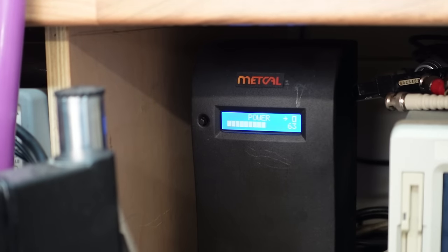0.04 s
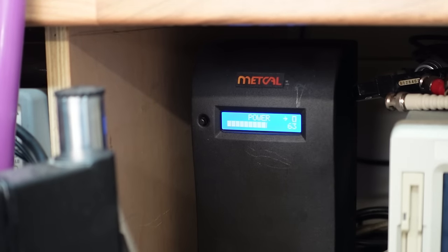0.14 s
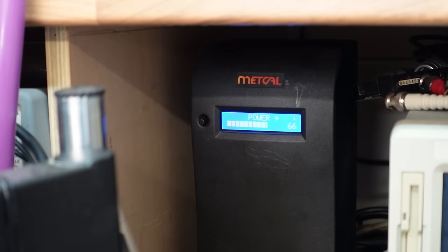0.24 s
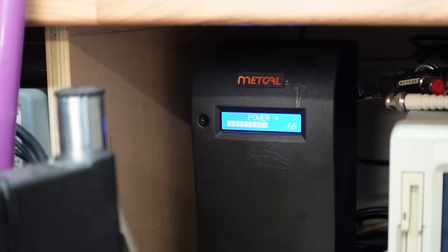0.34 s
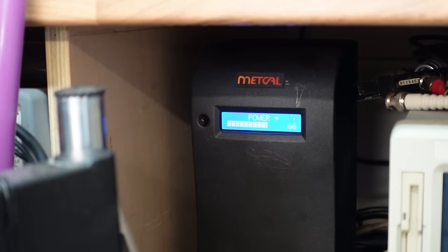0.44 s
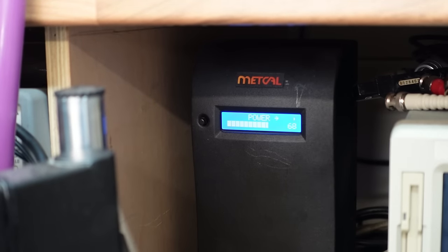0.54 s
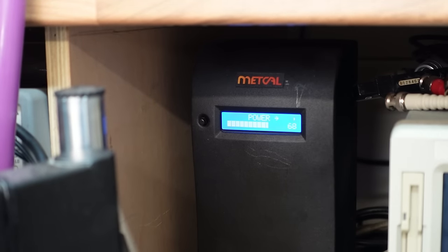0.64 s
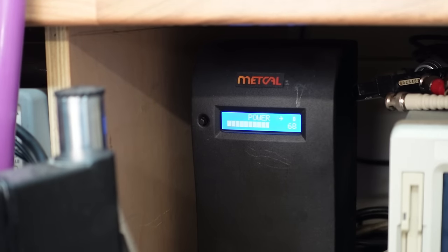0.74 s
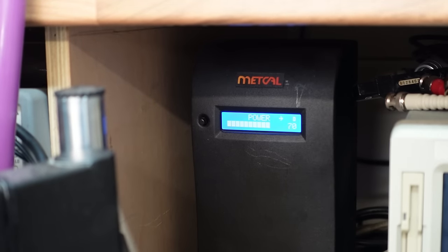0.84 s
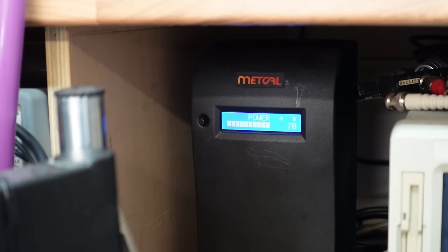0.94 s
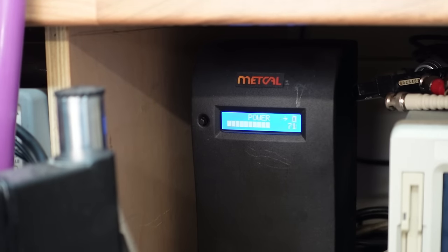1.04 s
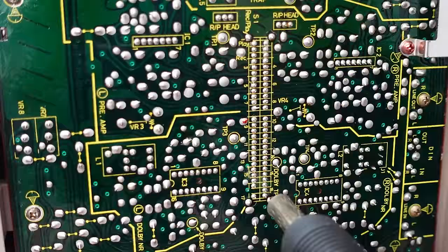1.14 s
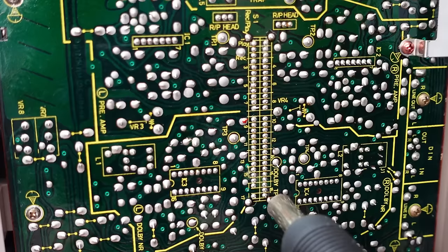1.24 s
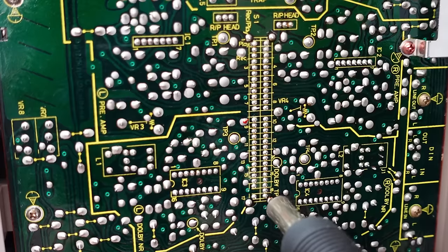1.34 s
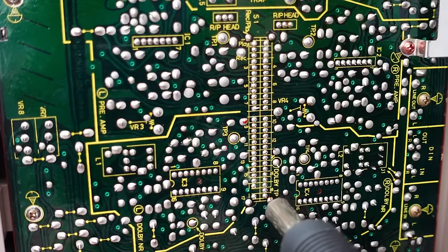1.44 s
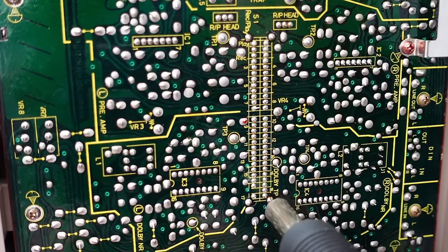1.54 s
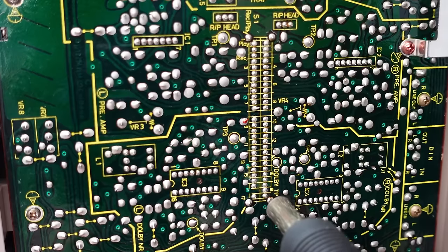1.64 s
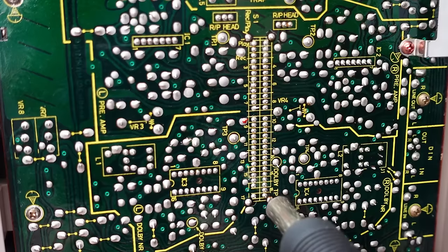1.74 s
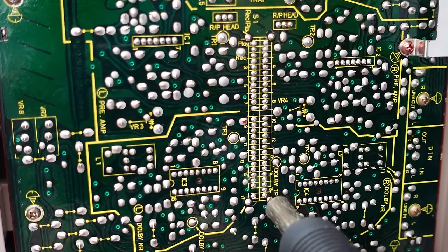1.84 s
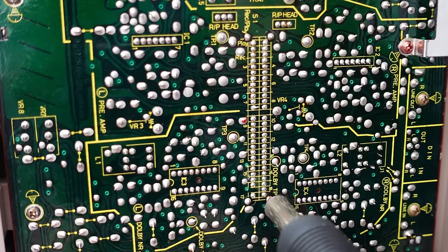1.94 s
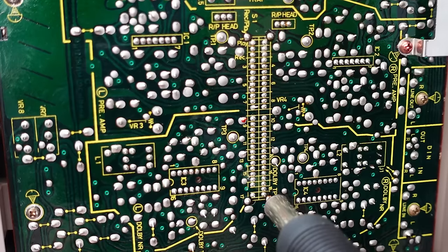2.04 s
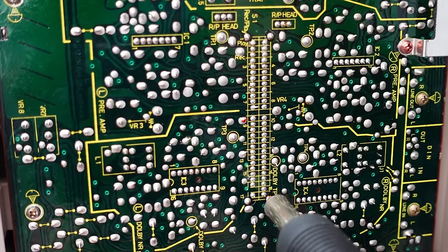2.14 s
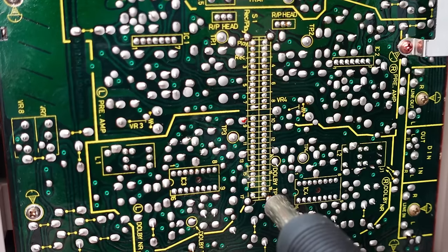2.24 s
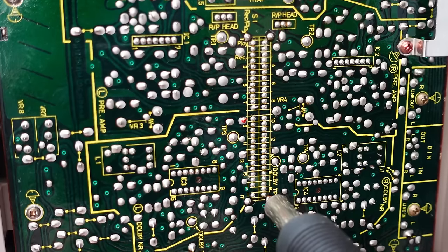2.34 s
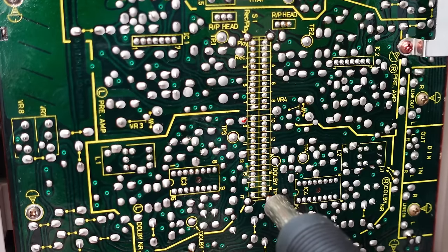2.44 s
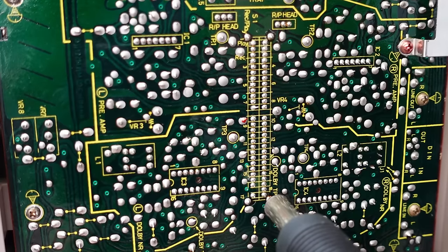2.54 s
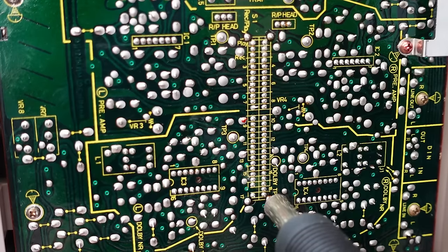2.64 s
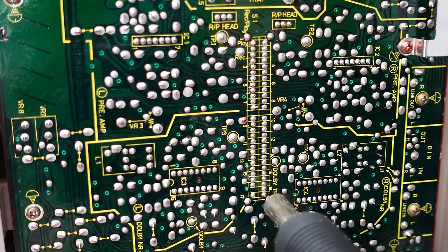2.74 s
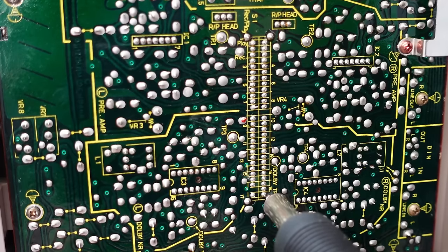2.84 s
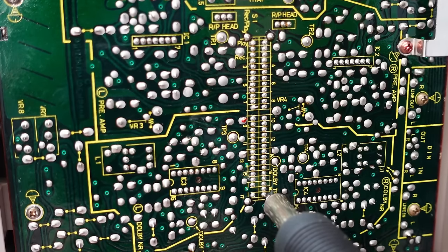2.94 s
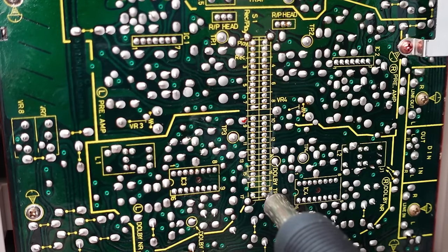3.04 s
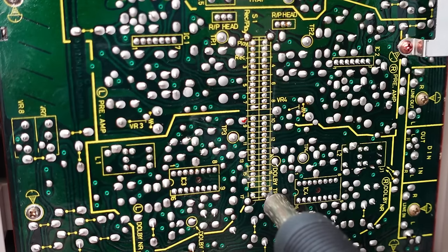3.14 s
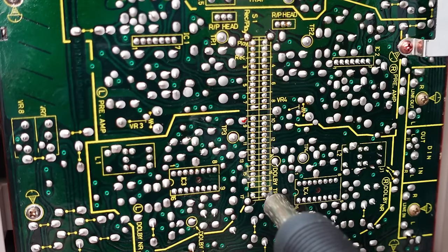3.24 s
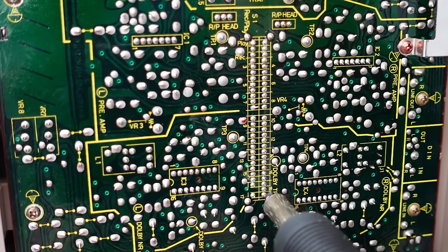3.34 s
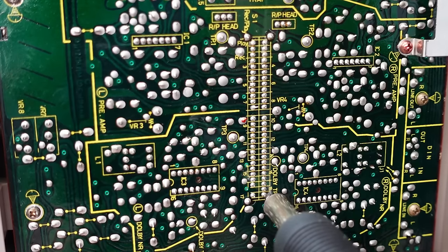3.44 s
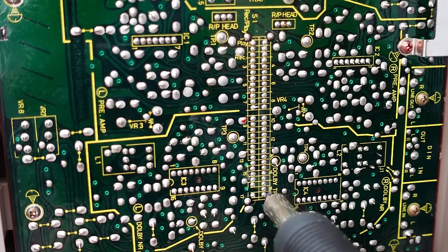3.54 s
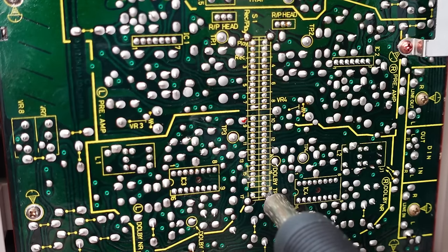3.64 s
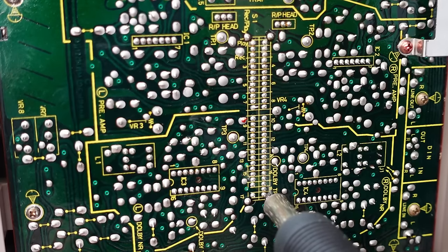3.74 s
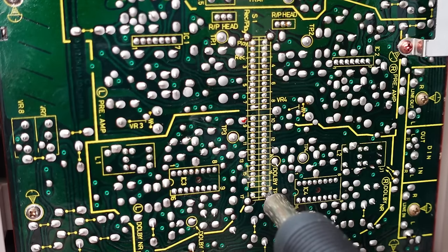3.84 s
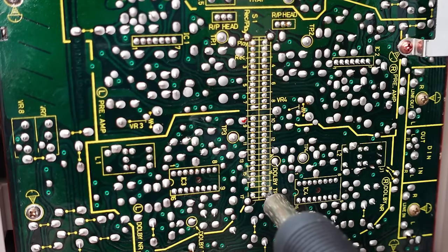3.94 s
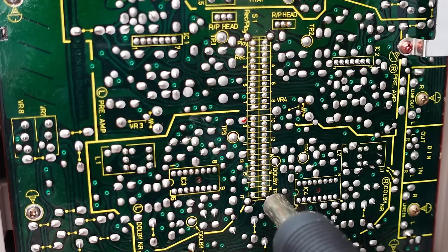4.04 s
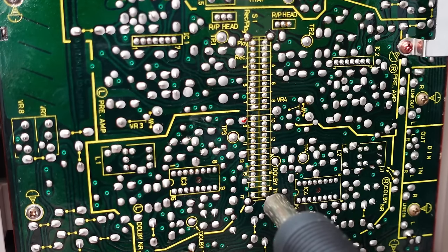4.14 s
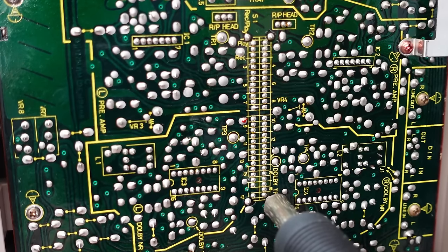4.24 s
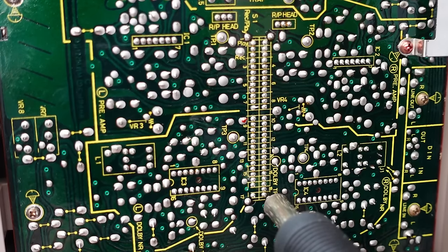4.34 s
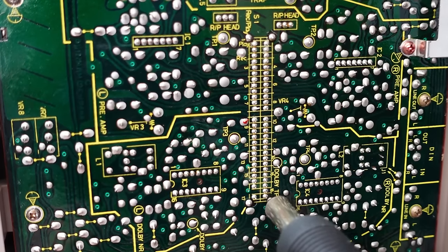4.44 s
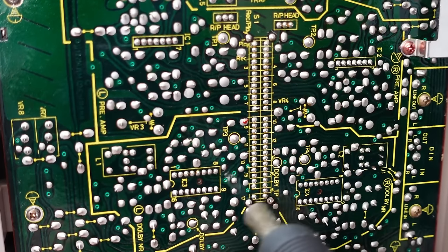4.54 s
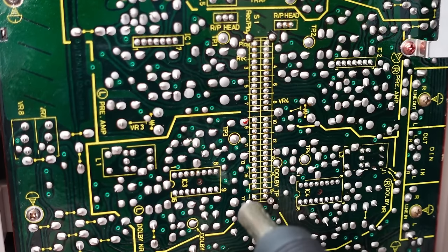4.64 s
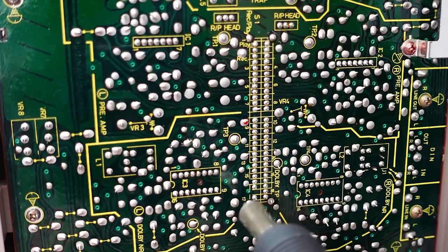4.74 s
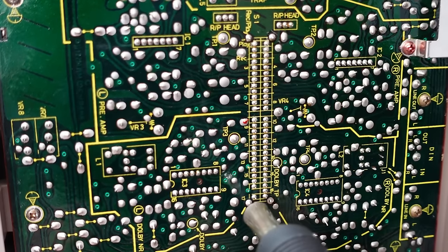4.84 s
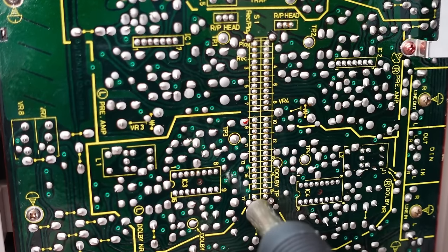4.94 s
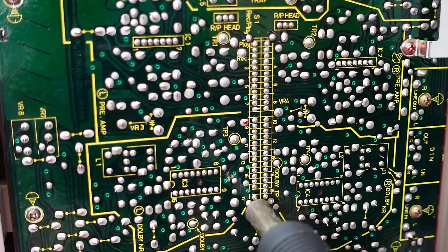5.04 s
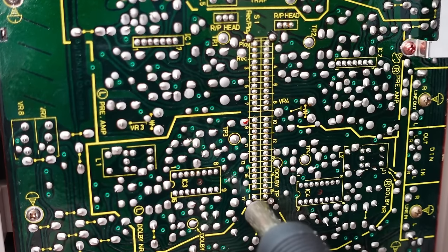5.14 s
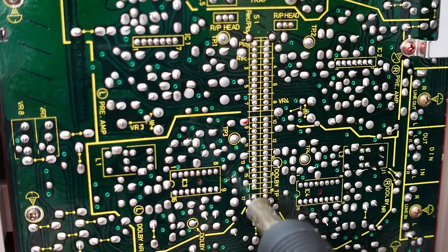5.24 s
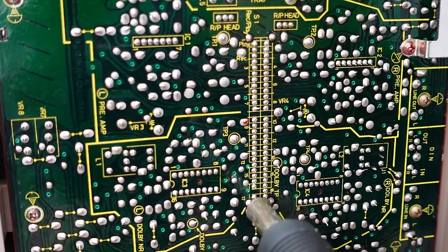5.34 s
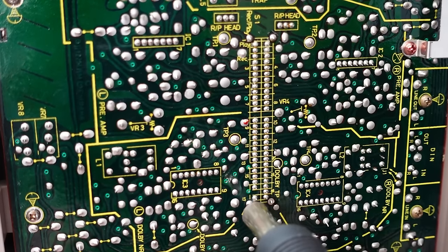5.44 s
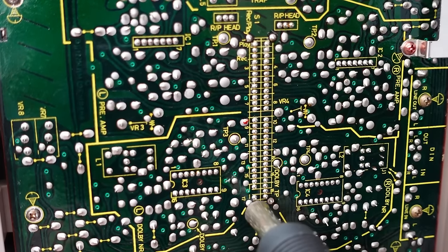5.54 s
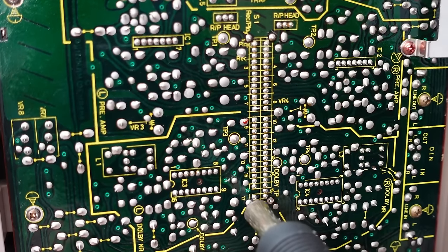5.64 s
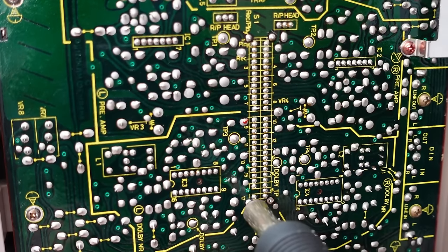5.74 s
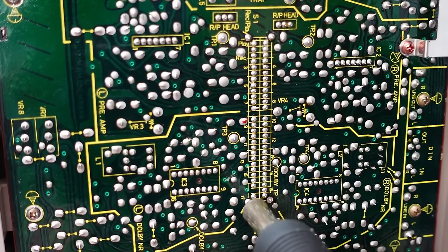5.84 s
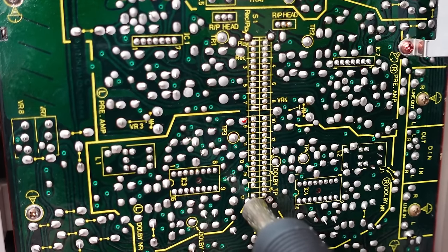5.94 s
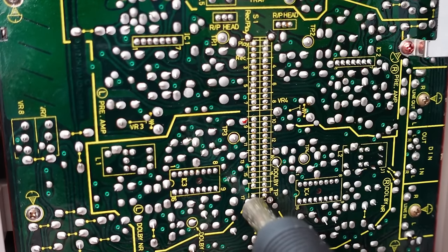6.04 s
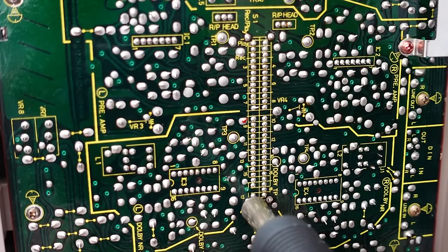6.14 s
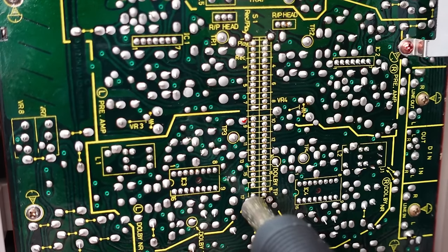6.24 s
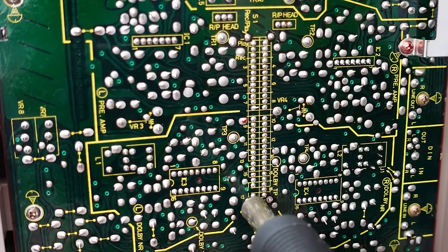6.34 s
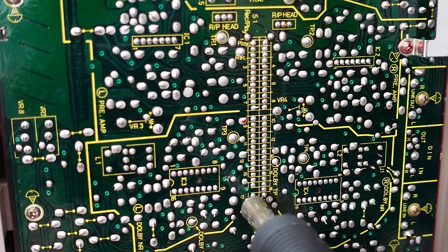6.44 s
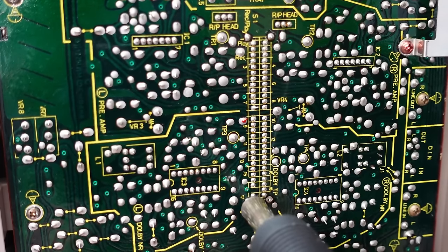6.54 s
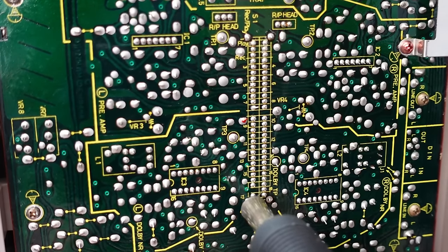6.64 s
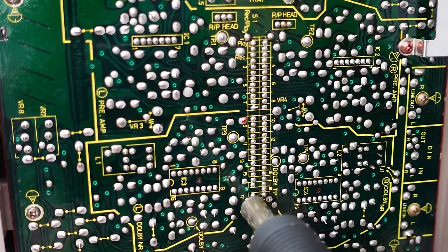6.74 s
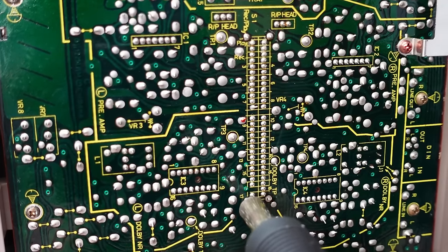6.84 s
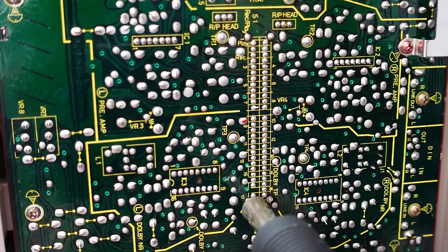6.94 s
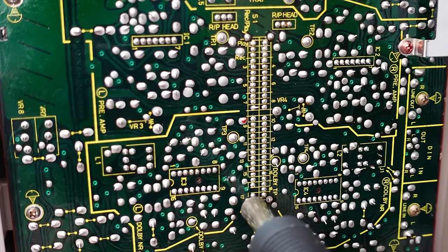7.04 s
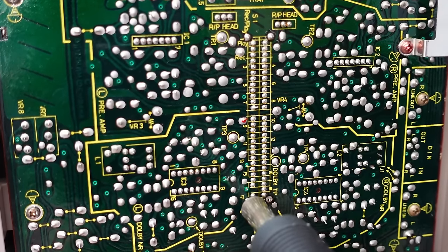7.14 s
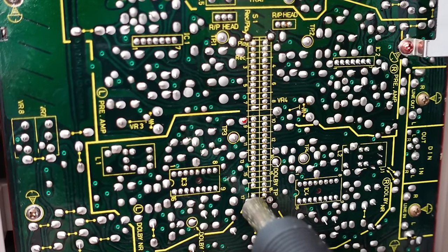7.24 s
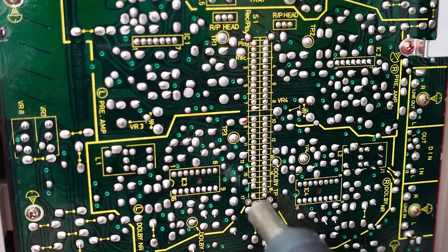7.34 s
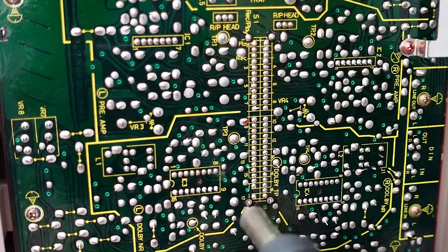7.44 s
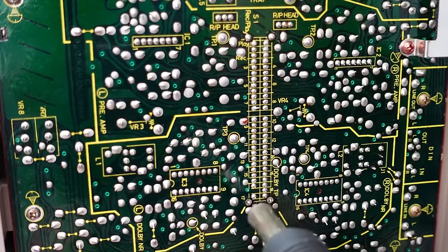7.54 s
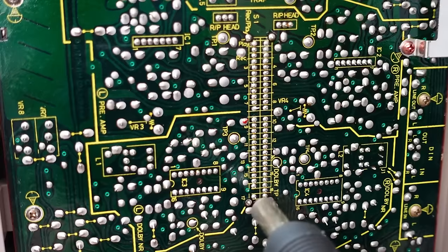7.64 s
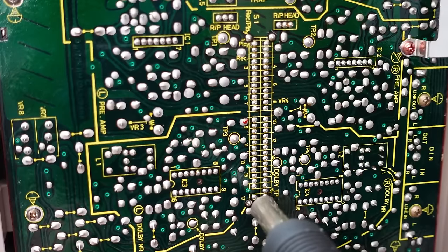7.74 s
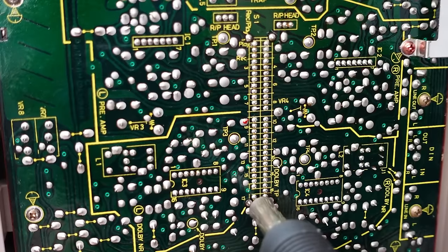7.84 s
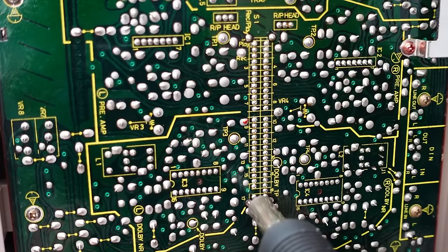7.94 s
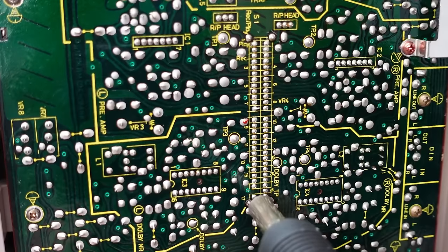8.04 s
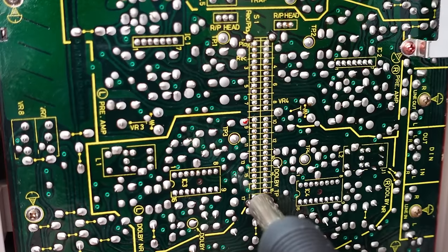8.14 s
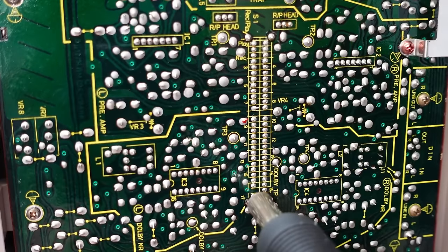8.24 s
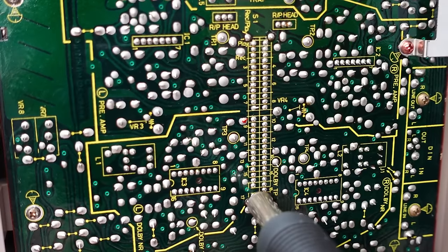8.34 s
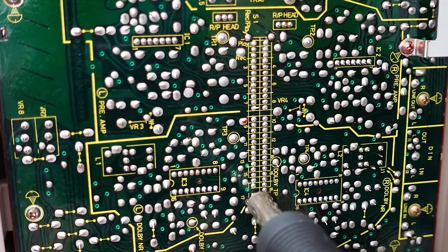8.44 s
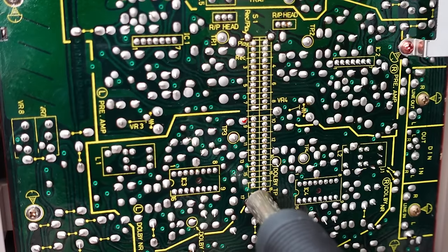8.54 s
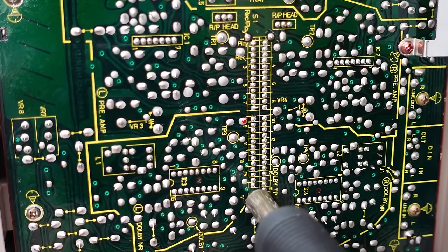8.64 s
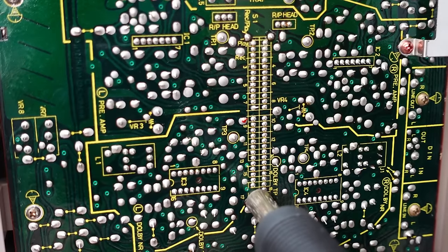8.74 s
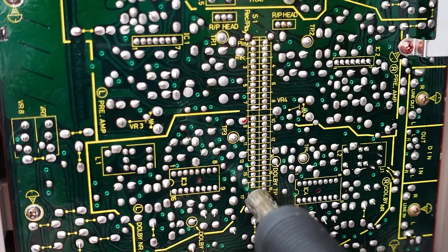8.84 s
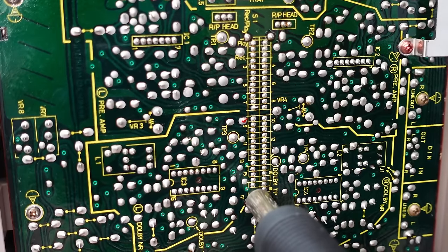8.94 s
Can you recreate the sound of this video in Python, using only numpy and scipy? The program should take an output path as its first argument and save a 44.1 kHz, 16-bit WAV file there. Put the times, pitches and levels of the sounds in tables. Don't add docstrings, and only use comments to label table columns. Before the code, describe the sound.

Close mono microphone at a workshop bench with steady fan drone and a thin air-leak hiss. A hot tool tip knocks sharply on a circuit board, then after a quieter stretch a bright, roaring blast of compressed air bursts out and cuts off with a crack. More taps and gritty scrapes follow, then a second, slightly longer blast, a soft breathy inrush of air, and small clicks.

```python
import sys
import numpy as np
from scipy import signal
from scipy.fft import rfft, irfft, next_fast_len
from scipy.io import wavfile
from scipy.ndimage import uniform_filter1d, map_coordinates

SR = 44100
rng = np.random.default_rng(int(sys.argv[2]) if len(sys.argv) > 2 else 0)


def field_ratio(decibels):
    return 10 ** (np.asarray(decibels, dtype=float) / 20)


def to_wav(sig):
    pcm = np.clip(np.atleast_2d(sig), -1, 1) * 32767
    pcm = np.round(pcm).astype(np.int16)
    wavfile.write(sys.argv[1], SR, pcm.T)


N = 396900
T = np.arange(N) / SR


def unit(x):
    return x / np.sqrt(np.mean(x ** 2) + 1e-20)


def along(points, hz):
    f, v = np.transpose(points)
    return np.interp(np.log(hz + 1), np.log(f + 1), v)


def curves(rows):
    s, *cols = np.transpose(rows)
    return [np.interp(T, s, c) for c in cols]


def wobble(rate):
    coarse = T[::16]
    knots = rng.standard_normal(int(N * rate / SR) + 4)
    return np.interp(T, coarse, map_coordinates(knots, [coarse * rate]))


def filtered(x, response):
    m = next_fast_len(len(x) + 8192)
    return irfft(rfft(x, m) * response(np.fft.rfftfreq(m, 1 / SR)), m)[:len(x)]


def humps(peaks, hz):
    return sum(field_ratio(db) ** 2 / (1 + (2 * (hz - c) / w) ** 2) for c, w, db in peaks)


def rush(gain, patchy_db):
    z = signal.stft(rng.standard_normal(N + 512), nperseg=512)[2]
    field = uniform_filter1d(rng.standard_normal(z.shape), 5, 0)
    field = uniform_filter1d(field, 10, 1)
    noise = signal.istft(z * field_ratio(patchy_db * unit(field)), nperseg=512)[1][:N]
    return unit(filtered(noise, gain))


def shop():
    # (time [s], fans [dB], leak [dB])
    shop_levels = [
        (0.0, -46.5, -47),
        (9.0, -44.5, -46),
    ]
    # (frequency [Hz], density [dB per Hz])
    fans_near = [(15, -31), (25, -3.5), (70, -10.5), (257, -1), (365, -6), (403, -5.5), (427, -14),
                 (489, -10), (667, -5.5), (750, -13), (910, -6), (1420, -18), (1660, -10.5), (1830, -20),
                 (2600, -23.5), (3380, -49), (5720, -120)]
    fans_far = [(15, -37), (25, -5), (141, -7.5), (257, -0.5), (387, -7), (452, -12), (654, -9), (735, -12),
                (826, -8.5), (1040, -2.5), (1270, -18), (1510, -10), (1700, -20), (1870, -14), (2600, -32),
                (3380, -55), (5720, -120)]
    # (frequency [Hz], density [dB per Hz])
    leak_colour = [(1290, -45), (2200, -11.5), (2780, -13), (3420, -2.5), (4030, 0.5), (5480, -15.5),
                   (6160, -18.5), (6640, -9), (7090, -7.5), (7900, -8.5), (8510, -17), (10500, -23.5),
                   (14500, -27), (16000, -24)]
    # (frequency [Hz], level [dB])
    blades = [(172.3, -57), (500.6, -60.5), (678.3, -56.5), (899.0, -58), (1071, -60), (1195, -60),
              (1507, -66.5), (1653, -60.5)]
    # (time [s], level [dB])
    motor_levels = [
        (7.38, -73),
        (7.45, -50.5),
        (8.6, -49),
        (8.7, -66),
    ]
    moved = T > 1.2

    fans_db, leak_db = curves(shop_levels)
    near = rush(lambda hz: field_ratio(along(fans_near, hz)), patchy_db=-0.5)
    far = rush(lambda hz: field_ratio(along(fans_far, hz)), patchy_db=2.0)
    fans = np.where(moved, near, far) * field_ratio(fans_db + .3 * wobble(3))
    leak = rush(lambda hz: field_ratio(along(leak_colour, hz)), patchy_db=0.67) * field_ratio(leak_db + 0.37 * wobble(8))
    tones = sum(field_ratio(db - 1.0 + 1.1 * wobble(2.9)) * np.sin(2 * np.pi * hz * T + 1.4 * wobble(6))
                for hz, db in blades)
    motor_db = curves(motor_levels)[0] + 0.72 * wobble(4)
    motor = field_ratio(motor_db) * np.sin(2 * np.pi * 88.5 * T + .3 * wobble(4))
    whine_db = -71 - 7 * moved + wobble(5)
    whine = field_ratio(whine_db) * np.sin(2 * np.pi * 15551 * T + .5 * wobble(20))
    return fans + leak + tones + motor + whine


def knocks():
    # (time [s], peak [dB], bench share [dB], tick share [dB], crack share [dB])
    contacts = [(1.213, -4, -24, -18, -36), (1.237, -18.5, -23, -27, -31), (1.5423, -5, -21, -39, -35.5),
                (1.6649, -10, -26, -35, -38), (1.8166, -22.5, -5.5, -18, -28),
                (2.759, -16.5, -21, -26, -35), (4.481, -8, -43, -5, -4), (4.547, -14.5, -20, -22, -12),
                (5.256, -22, -7.5, -9, -26), (5.401, -34, -11, -13.5, -19), (5.5402, -7, -17, -13, -25),
                (5.5763, -13.5, -24, -24, -33), (7.398, -11, -20.5, -10, -7), (7.91, -23.5, -16, -28, -33),
                (7.966, -40.5, -1.5, -21, -18), (8.0658, -32.5, -4.5, -20, -20),
                (8.097, -20.5, -19, -6, -22), (8.104, -29, -22, -8, -19), (8.1925, -23.5, -3, -24, -34),
                (8.5568, -22.5, -6, -22, -28), (8.634, -44, -2, -15, -25), (8.828, -47, -6, -17, -25)]
    # (frequency [Hz], level [dB], t60 [s])
    bench_modes = [(216, -20, 0.16), (297, 7.5, 0.086), (326, 11, 0.125), (413, 3, 0.12),
                   (542, 16.5, 0.021)]
    board_modes = [(705, -3, 0.09), (998, -12.5, 0.1), (1296, 2, 0.041), (1415, -2, 0.043),
                   (1744, -9, 0.11), (1920, 3.5, 0.027), (2120, -2.5, 0.039), (2402, -8.5, 0.04),
                   (2820, -14, 0.027), (3080, -7, 0.025)]
    tick_modes = [(2510, 6, 0.055), (2850, -2.5, 0.041), (2940, 8, 0.011), (3300, -26, 0.04)]
    tip_hz, tip_db, tip_t60 = 4980, 2.5, .03

    out, t = np.zeros(N + SR), np.arange(SR // 4) / SR
    rattle_band = signal.butter(3, [300, 2100], "band", fs=SR)
    crack_band = signal.butter(2, [3600, 9000], "band", fs=SR)
    blunt_band = signal.butter(6, [130, 3300], "band", fs=SR, output="sos")

    def ring(modes, stretch):
        return sum(field_ratio(level + rng.normal(0, 0.9) - 60 * t / (t60 * stretch))
                   * np.sin(2 * np.pi * hz * rng.normal(1, 0.0094) * t) for hz, level, t60 in modes)

    for s, db, bench_db, tick_db, crack_db in contacts:
        stretch = max(0.67 - .002 * db, .2)
        board = 0.36 * ring(board_modes, stretch)
        bench = 0.44 * field_ratio(bench_db) * ring(bench_modes, stretch)
        tick = 0.53 * field_ratio(tick_db) * ring(tick_modes, stretch)
        rattle = signal.lfilter(*rattle_band, rng.standard_normal(len(t)))
        rattle *= field_ratio(-4.5 - 60 * t / (0.12 * stretch))
        crack = signal.lfilter(*crack_band, rng.standard_normal(len(t)))
        crack *= field_ratio(crack_db + 11.5 - 60 * t / 0.028)
        tip_tone = np.sin(2 * np.pi * tip_hz * rng.normal(1, 0.0097) * t)
        crack += field_ratio(crack_db + tip_db - 60 * t / tip_t60) * tip_tone
        push = np.diff(np.exp(-((t - .0004) / .00013) ** 2), prepend=0)
        push_db = 19.0 - .35 * max(bench_db + 20, 0)
        hit = board + bench + tick + rattle + field_ratio(push_db) * push
        out[round((s + .0009) * SR):][:len(t)] += field_ratio(db - 3) * (signal.sosfilt(blunt_band, hit) + crack)
    return out[:N]


def swelling_tones():
    # (time [s], frequency [Hz], level [dB], length [s])
    swells = [(1.993, 9400, -49, .005), (1.993, 14500, -55, .005), (1.996, 2290, -45, .008),
              (2.76, 1150, -22.5, 0.0076), (2.758, 2450, -28.5, .006), (3.01, 2300, -41, 0.0063),
              (3.01, 3300, -35.5, 0.0067), (3.006, 7600, -45, .008), (4.042, 1250, -25, 0.0044),
              (4.047, 1150, -13, 0.0087), (4.475, 961, -18, 0.011), (5.285, 322, -31, 0.04),
              (6.8293, 1230, -26, 0.0036), (6.835, 1050, -4.5, 0.0032), (7.385, 1300, -17, .011),
              (7.394, 947, -17.5, .011), (8.096, 2740, -25.5, 0.006)]
    out = np.zeros(N + SR)
    for s, hz, db, length in swells:
        u = T[:round(length * SR)]
        swell = np.sin(np.pi * u / length)
        out[round(s * SR):][:len(u)] += field_ratio(db) * np.sin(2 * np.pi * hz * (s + u)) * swell
    return out[:N]


def snicks():
    # (time [s], level [dB])
    snaps = [
        (1.994, -47),
        (8.647, -45),
        (8.844, -50),
    ]
    # (low [Hz], high [Hz])
    snap_hz = [8500, 15500]
    out, t = np.zeros(N + SR), T[:SR // 50]
    band = signal.butter(2, snap_hz, "band", fs=SR)
    for s, db in snaps:
        click = unit(signal.lfilter(*band, rng.standard_normal(len(t))))
        out[round(s * SR):][:len(t)] += field_ratio(db - 60 * t / .012) * click
    return out[:N]


def scrapes():
    # (time [s], length [s], level [dB], centre [Hz])
    slides = [
        (2.699, 0.066, -41.5, 700),
        (5.39, 0.025, -41.5, 2000),
        (5.692, 0.061, -45, 1880),
        (6.054, 0.059, -41.5, 1420),
        (7.96, .03, -55, 1200),
    ]
    out = np.zeros(N + SR)
    for s, length, db, centre in slides:
        u = T[:round(length * SR)]
        peaks = [(centre, 1300, 0), (320, 160, -2)]
        grit = filtered(rng.standard_normal(len(u)), lambda f: np.sqrt(humps(peaks, f)) * (f < 3600))
        bumps = field_ratio(2.5 * wobble(150)[:len(u)])
        out[round(s * SR):][:len(u)] += field_ratio(db) * bumps * unit(grit) * np.sin(np.pi * u / length)
    return out[:N]


def room(x):
    # (frequency [Hz], t60 [s])
    decay = [(200, 0.48), (1500, 0.12), (8000, 0.083)]
    hz, t, z = signal.stft(rng.standard_normal(SR // 2), SR, nperseg=256)
    tail = signal.istft(z * field_ratio(-60 * t / along(decay, hz)[:, None]), SR, nperseg=256)[1]
    return signal.fftconvolve(np.pad(x, (200, 0)), tail / np.linalg.norm(tail))[:N]


def echoes(x, wet_db, t60):
    t = np.arange(SR // 10) / SR
    answer = rng.standard_normal(len(t)) * field_ratio(-60 * t / t60)
    answer *= field_ratio(wet_db) / np.linalg.norm(answer)
    answer[0] = 1
    return signal.fftconvolve(x, answer / np.linalg.norm(answer))[:N]


def flow(shut_s):
    # (time [s], depth [dB], half length [s])
    falters = [
        (4.462, 4, 0.01),
        (4.489, 9, 0.0095),
        (7.37, 0, 0.013),
        (7.403, 4, .008),
    ]
    shut_db, shut_length_s, hose_s = 5.5, 0.0033, 0.035
    sag_db = sum(db * np.exp(-((T - s) / half) ** 2) for s, db, half in falters)
    emptying_s = np.maximum(T - shut_s - hose_s, 0)
    bleed_db = 300 * emptying_s
    main = field_ratio(-sag_db - shut_db * np.clip((T - shut_s) / shut_length_s, 0, 1) - bleed_db)
    seep = field_ratio(-28 - 108 * emptying_s)
    both = main ** 2 + seep ** 2 + 1e-20
    share = main ** 2 / both
    main_top_db = 3.5 + 0.55 * sag_db - .12 * bleed_db
    seep_top_db = 10
    return 10 * np.log10(both), share * main_top_db + (1 - share) * seep_top_db


def jet():
    # (opens [s], first surge [dB], pressure push [dB], shuts [s], jet level [dB])
    strokes = [
        (4.048, 8, -6, 4.482, -12.5),
        (6.8345, 7.5, -2, 7.4, -13),
    ]
    # (frequency [Hz], density [dB per Hz])
    roar = [(210, -73.5), (350, -35), (550, -27.5), (700, -18.5), (850, -11.5), (1000, -7.5), (1730, -3.5),
            (2130, -4.5), (3390, -0.5), (5570, -4.5), (6430, -0.5), (7550, -6.5), (11100, -14),
            (16000, -21.5)]
    # (centre [Hz], width [Hz], level [dB]), all rung alike
    nozzle = [(2740, 320, -2), (3520, 180, -1), (4730, 23, -2), (5020, 130, -2), (4850, 360, -2),
              (6050, 88, -3), (6600, 400, 0), (8100, 56, -6), (8620, 160, -6), (10100, 290, -5),
              (10670, 570, -7), (11300, 240, -9), (13600, 390, -13), (15200, 110, -15)]
    tubes = [(c, w, 0) for c, w, _ in nozzle]

    def colour(hz):
        return field_ratio(along(roar, hz)) * np.sqrt(1 + 1.17 * humps(tubes, hz))

    air = np.zeros(N)
    for _ in range(2):
        air += echoes(rush(colour, patchy_db=1.8), wet_db=-5, t60=0.094) * field_ratio(1.8 * wobble(6.4))
    air *= field_ratio(0.36 * wobble(45) + 0.55 * wobble(180))
    top = filtered(air, lambda hz: 1 - 1 / (1 + (hz / 8500) ** 8))
    air /= np.sqrt(np.abs(uniform_filter1d(air ** 2, SR // 10)))

    out, loud_db = np.zeros(N), np.full(N, -90.)
    for s, surge_db, push_db, shut_s, jet_db in strokes:
        flow_db, top_db = flow(shut_s)
        age = np.maximum(T - s, 0)
        db = jet_db + flow_db + surge_db * np.exp(-age / 0.0044)
        body = air - top + field_ratio(top_db) * top
        out += body * field_ratio(db) * (1 - np.exp(-age / 0.00059))
        u = np.maximum(T - s + 0.00067, 0) / 0.00043
        out -= field_ratio(push_db) * u * (2.2 - u) * np.exp(-u)
        loud_db = np.maximum(loud_db, np.where(T > s, db, -90))
    return out, loud_db


def ducking(loud_db):
    cut_db = 0.84 * np.maximum(loud_db + 43, 0)
    hold = np.exp(-1 / (.35 * SR))
    creep_db = 0.23 * signal.lfilter([1 - hold], [1, -hold], cut_db)
    return field_ratio(-np.maximum(cut_db, creep_db))


def inflow():
    # (centre [Hz], width [Hz], level [dB])
    tip_tubes = [(1340, 140, -3), (1590, 140, -1.5), (2330, 220, 1), (3200, 190, -1.5), (4650, 600, -9),
                 (900, 500, -8), (7800, 3500, -15)]
    starts_s, swell_s, lasts_s = 7.41, 0.035, 0.29
    age = np.maximum(T - starts_s, 0)
    db = -32 - 22 * age - 110 * np.maximum(age - lasts_s, 0) + .5 * wobble(30)
    air = rush(lambda hz: humps(tip_tubes, hz) ** (3 / 4), patchy_db=-0.5)
    return np.clip(age / swell_s, 0, 1) * field_ratio(db) * air


def scene():
    blast, loud_db = jet()
    hits = knocks() + swelling_tones() + snicks() + scrapes()
    background = ducking(loud_db) * shop()
    mono = blast + inflow() + hits + field_ratio(-11.0) * room(hits) + background
    trace = field_ratio(-79) * rush(lambda hz: 1 / (1 + hz / 40) + .004, patchy_db=1)
    return np.array([mono + trace, mono - trace])


def roll_off(x):
    return signal.sosfilt(signal.butter(12, 17130, fs=SR, output="sos"), x)


def record(dry):
    held = dry / (1 + np.abs(dry / .88) ** 4) ** (1 / 4)
    edge = lambda hz: .5 - .5 * np.tanh((hz - 15740) / 25)
    mix = np.array([filtered(v, edge) for v in held])
    return roll_off(mix)


dry = scene()
out = record(dry)
to_wav(out)
```